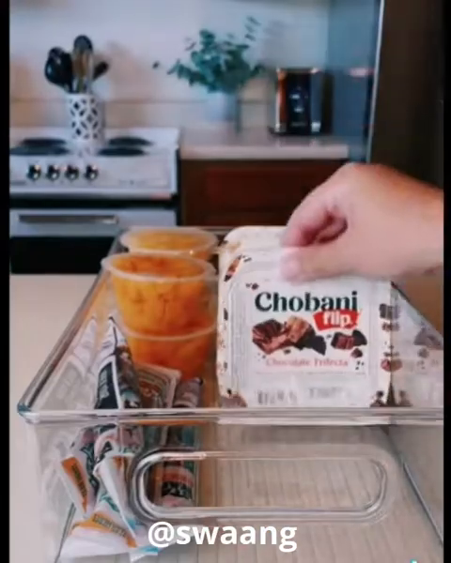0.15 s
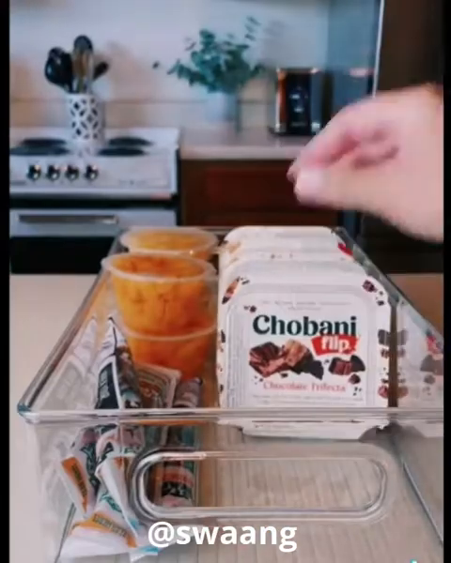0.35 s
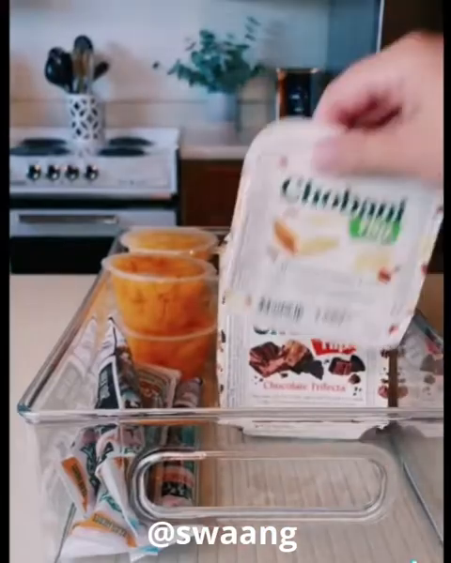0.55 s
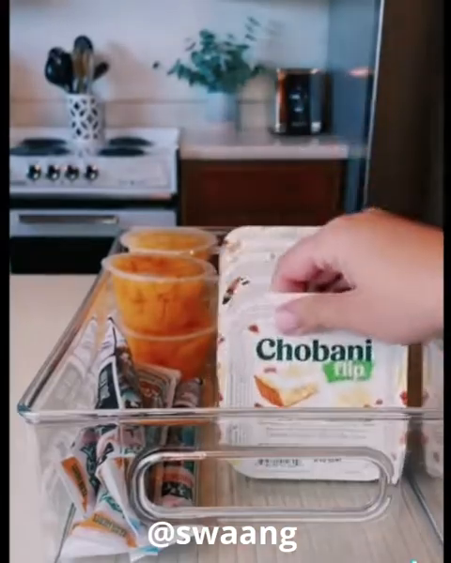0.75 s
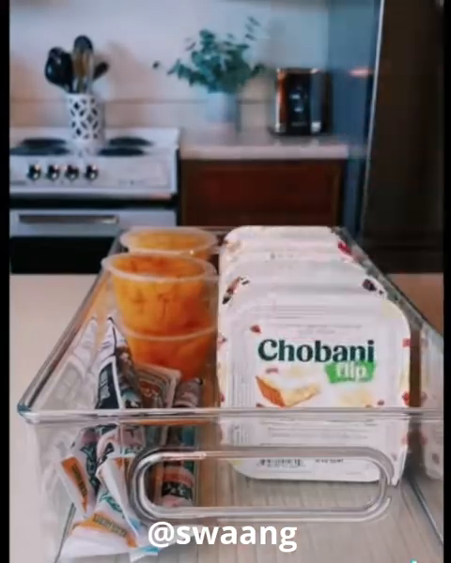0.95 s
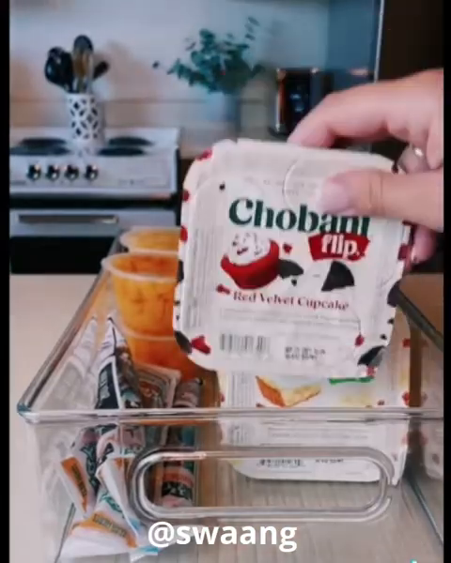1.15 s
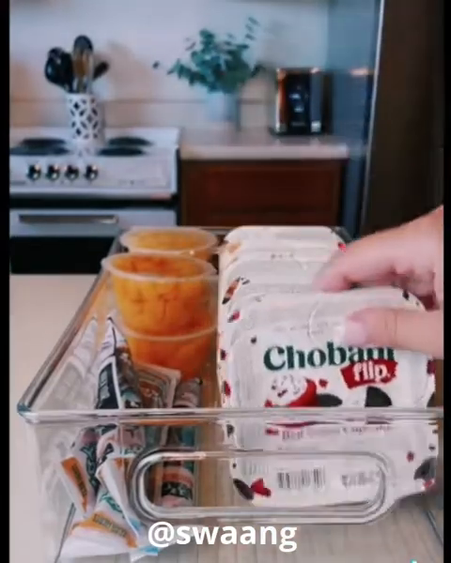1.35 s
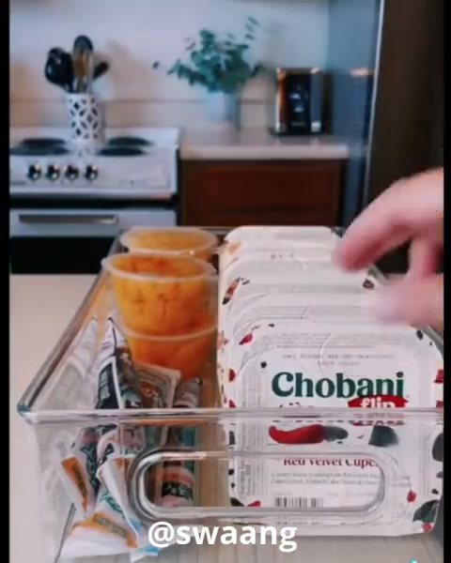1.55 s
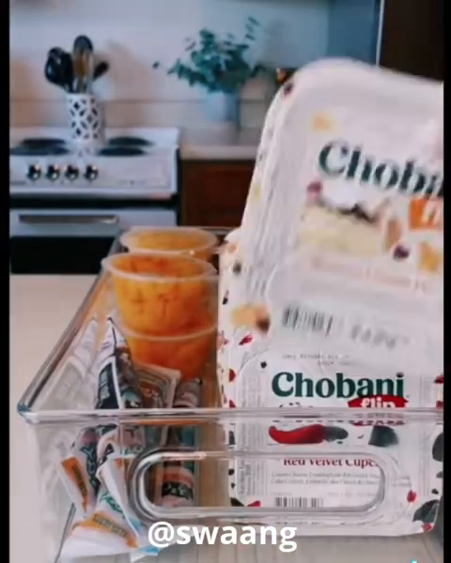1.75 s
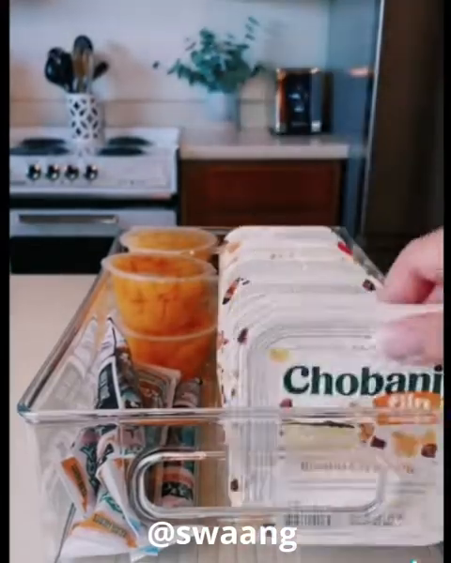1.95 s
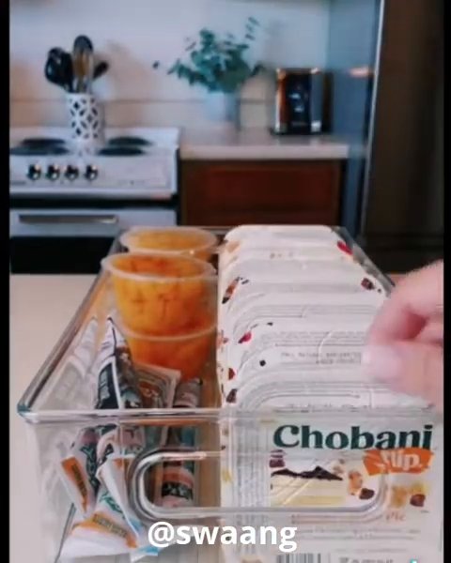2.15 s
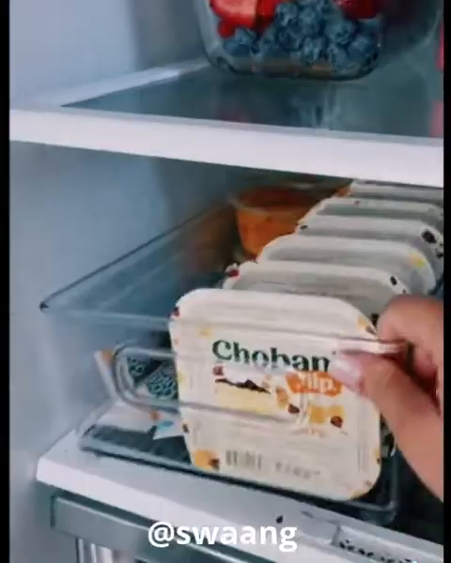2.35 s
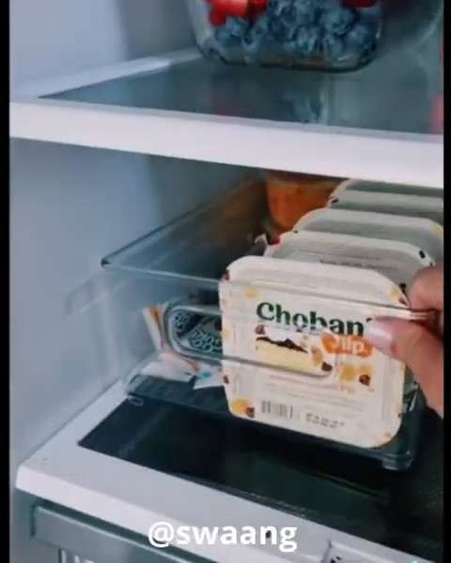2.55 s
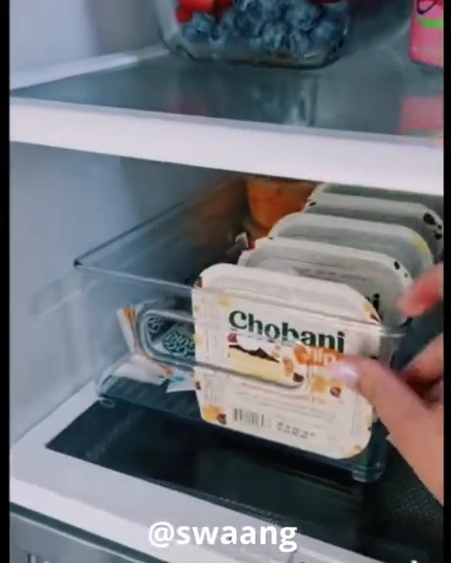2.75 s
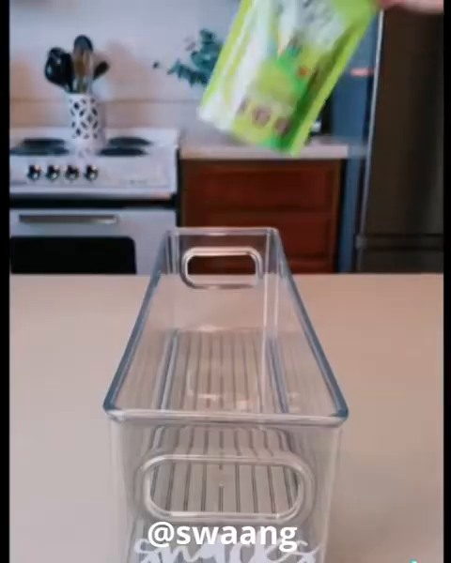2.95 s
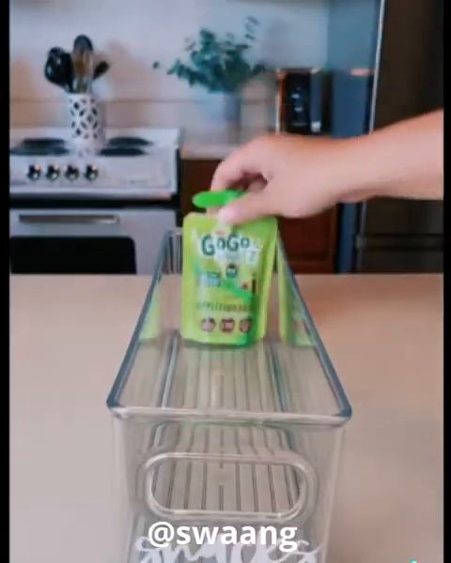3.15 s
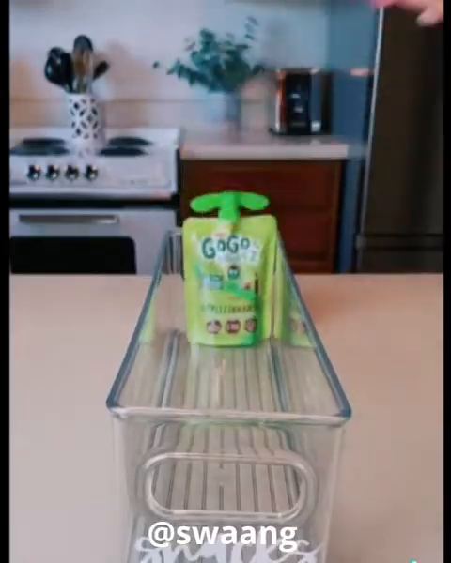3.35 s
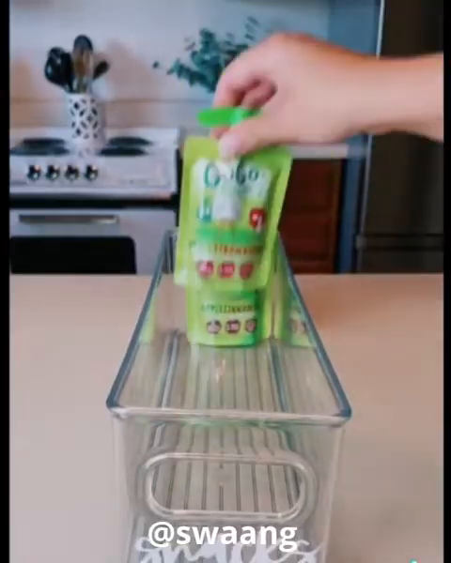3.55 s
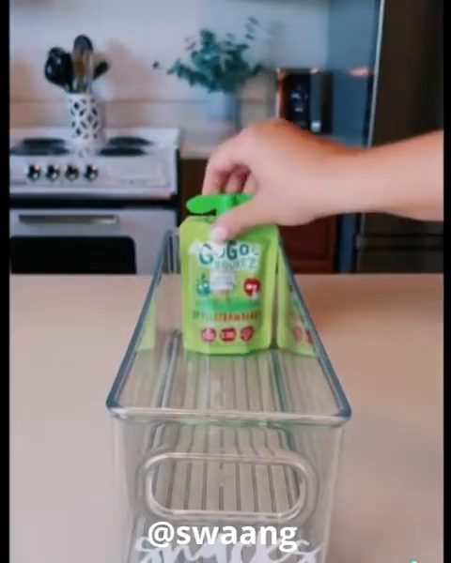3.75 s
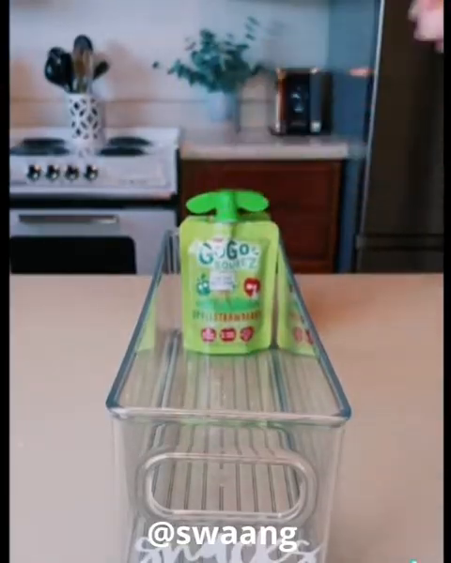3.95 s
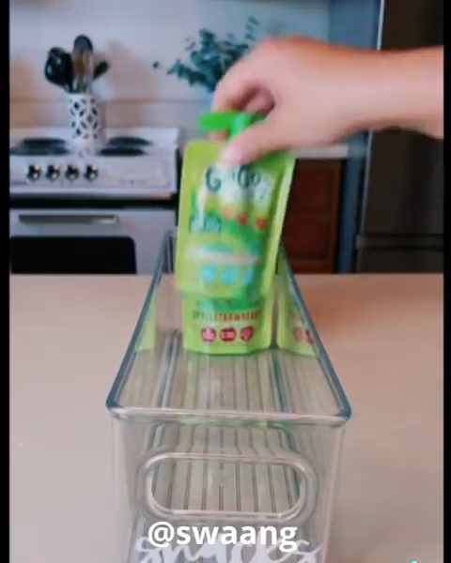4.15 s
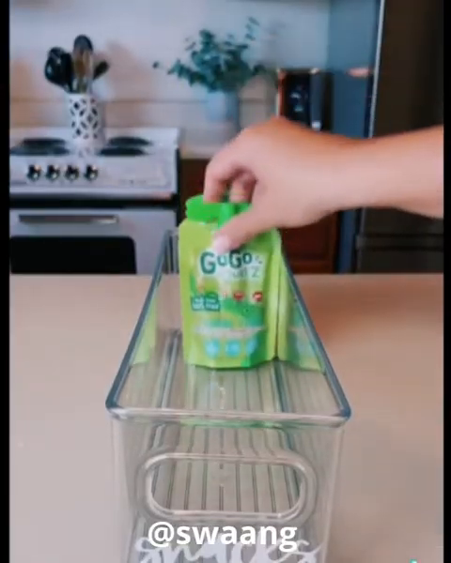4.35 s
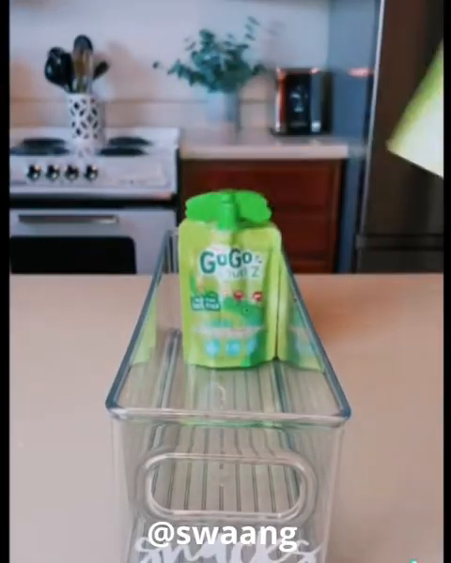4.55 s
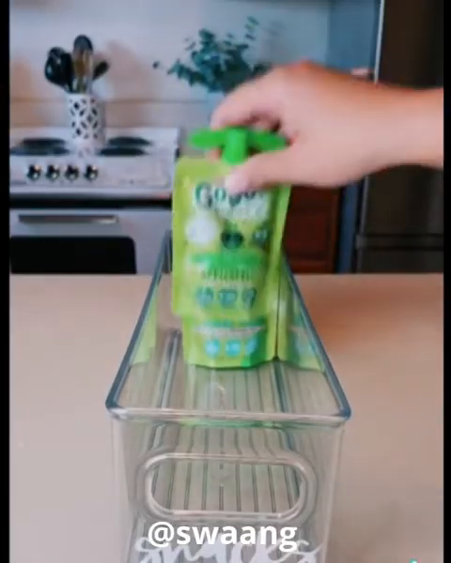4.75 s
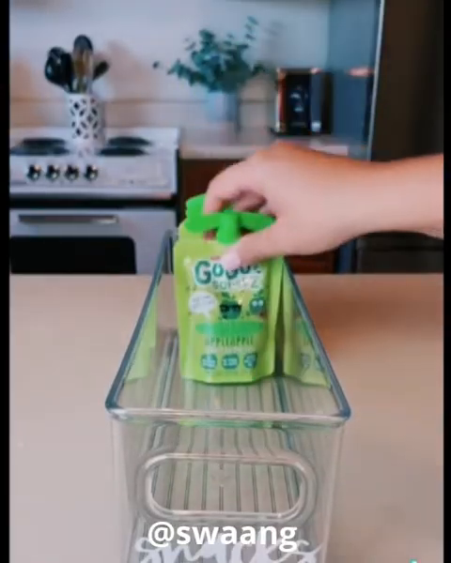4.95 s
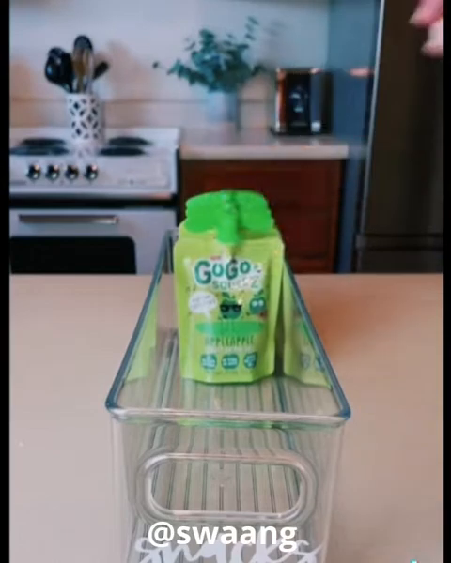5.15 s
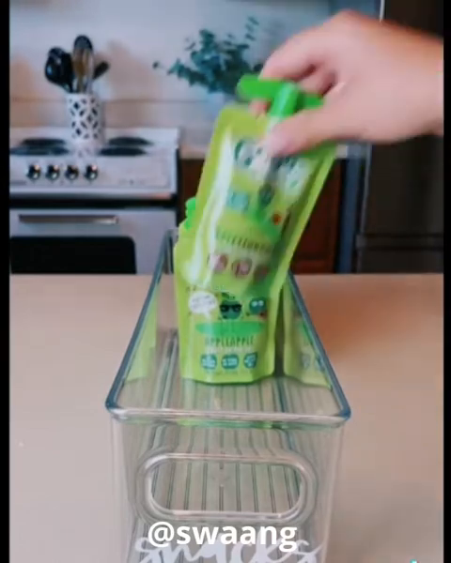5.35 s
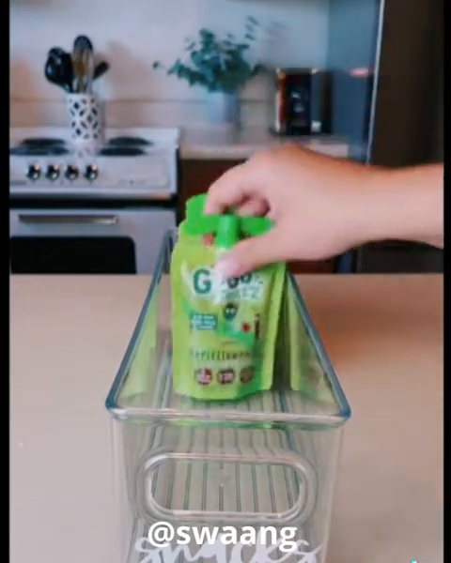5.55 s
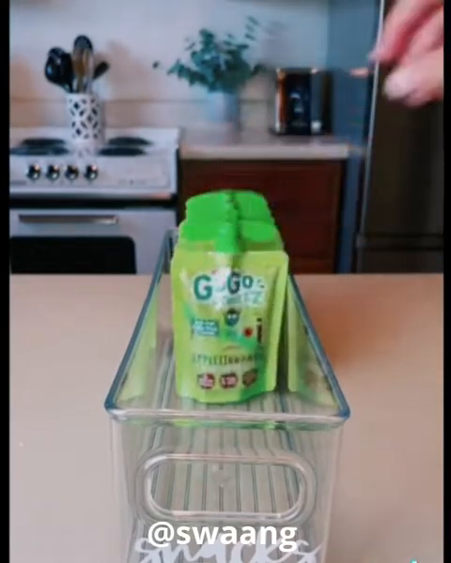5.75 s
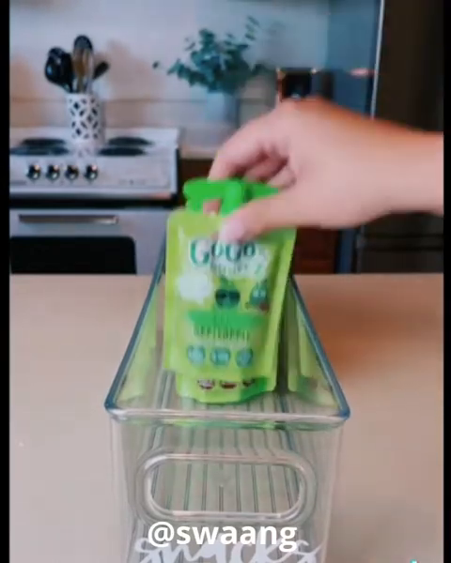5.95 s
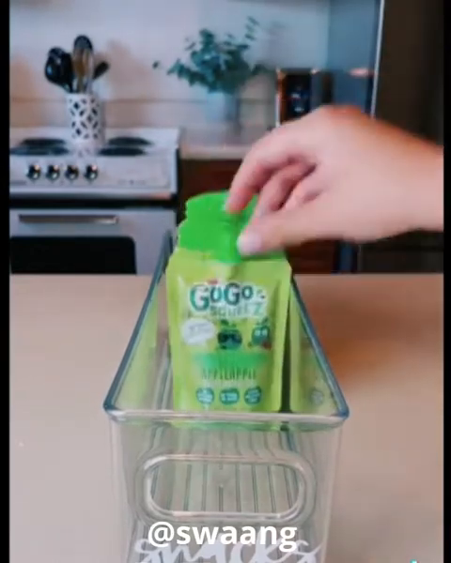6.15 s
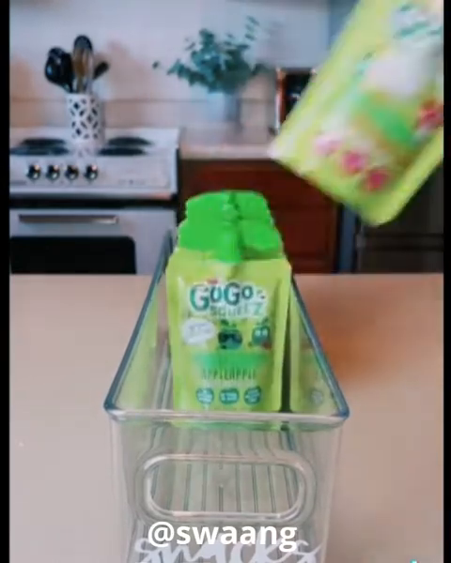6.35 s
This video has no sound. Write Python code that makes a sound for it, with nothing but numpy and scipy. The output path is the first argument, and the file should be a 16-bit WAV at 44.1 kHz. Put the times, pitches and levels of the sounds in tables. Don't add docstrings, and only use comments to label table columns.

```python
import sys
import numpy as np
from scipy import signal
from scipy.fft import rfft, irfft, next_fast_len
from scipy.io import wavfile
from scipy.ndimage import uniform_filter1d

SR = 44100
rng = np.random.default_rng(int(sys.argv[2]) if len(sys.argv) > 2 else 0)


def master_out(mix):
    frames = np.transpose(np.atleast_2d(mix))
    ceiling = np.clip(frames, -1, 1)
    pcm = np.round(ceiling * 32767).astype(np.int16)
    wavfile.write(sys.argv[1], SR, pcm)


def voltage_ratio(decibels):
    exponent = np.asarray(decibels, float) / 20
    return 10 ** exponent


N = 281787

# start_s, end_s
STRETCHES = [
    (0, 2.352),
    (2.352, 2.96),
    (2.97, 3.468),
    (3.466, 6.39),
]
# freq_hz, density_db
TONE_CUPS = [(15, -93), (25, -56), (64, -15.5), (134, -17.5), (175, -6), (236, 3), (309, -9), (363, -6.5),
             (575, -10.5), (1130, -27.5), (1700, -38), (2480, -38), (2760, -41.5), (8140, -52),
             (16000, -52.5)]
TONE_FRIDGE = [(15, -99), (25, -69), (206, 3), (293, -13.5), (531, -17), (1370, -35.5), (2050, -42.5),
               (3430, -49), (16000, -77.5)]
TONE_FAST = [(15, -100), (25, -48), (175, -19.5), (277, -4), (363, -25.5), (394, -5), (476, -19.5),
             (624, -19), (2000, -46), (2760, -49.5), (16000, -66)]
TONE_SLOW = [(15, -78), (25, -18), (87, -22.5), (153, -4), (200, -14), (242, -13), (317, -13), (416, -17),
             (476, -19), (575, -29.5), (714, -31), (988, -43), (1700, -45), (1940, -50.5), (16000, -69.5)]
TONE_DB = (-54.5, -49, -52.5, -53)
TONE_EXTRA_SIDE_DB = (0.053, 10, .1, 0.25)
# freq_hz, side_minus_mid_db
TONE_WIDTH = [(60, -56), (110, -53), (200, -33), (380, -20), (700, -11.5), (1290, 0), (2380, 3), (4400, -5),
              (8120, -2), (15000, 0)]
# start_s, end_s, pitch_hz, width_hz, level_db
HUMS = [
    (0, 3.1, 362, 6.7, -62.5),
    (0, 2.6, 575, 15, -67.5),
    (0, 2.351, 2480, 110, -87),
    (2.8, 2.954, 3350, 25, -85),
    (2.353, 2.954, 208.5, 6, -56.5),
]
# start_s, end_s, lower_hz, lower_db, upper_db
MOTOR = [
    (2.976, 3.468, 397.5, -56, -59),
    (3.468, 3.84, 285.5, -58, -57),
    (3.5, 4.067, 188, -58, -70),
    (4.2, 4.626, 238, -61, -66),
    (4.626, 5.15, 237, -66, -68),
    (5.2, 5.883, 236, -58, -60),
    (5.883, 6.33, 242, -53, -63),
]

# start_s, peak_db, low_hz, high_hz, t60_s
THUDS = [(1.457, -36.5, 229, 325, 0.085), (2.117, -47, 233, 337, 0.096), (2.407, -30, 230, 325, 0.06),
         (2.503, -42, 222, 330, 0.06), (2.567, -31.5, 326, 550, 0.029), (2.6, -18.5, 248, 348, 0.058),
         (2.624, -36, 270, 325, .05), (2.668, -15, 225, 322, 0.043), (2.696, -38, 215, 310, .06),
         (3.747, -42.5, 294, 542, .085), (4.344, -37, 436, 674, 0.037), (4.969, -42, 386, 680, 0.013),
         (6.09, -40.5, 366, 655, 0.087)]
# multiple, level_db
SQUEAK_PARTIALS = [(2, -51), (3, -65), (4, -71), (5, -68)]

# freq_hz, density_db
RUB_COLOUR = [(410, -26.5), (700, -3.5), (1460, -7.5), (1620, -10), (2240, -5), (4050, -10.5), (4730, -8.5),
              (7690, -10.5), (8990, -15.5), (13000, -18.5), (16000, -18.5)]
# freq_hz, gain_db
GLASS_RUB = [(900, -.1), (1800, -3), (2700, 2.1), (4000, .1), (6000, -3), (14000, -.1)]
FOIL_RUB = [(900, -2.1), (1500, 1.1), (2300, 1.6), (3500, -3.5), (5500, 1.1), (8000, -1.1), (14000, -.1)]
# start_s, length_s, level_db, treble_above_body_db
SLIDES = [(0.678, 0.12, -72, 2.5), (1.269, 0.12, -69.5, -2.5), (2.091, 0.063, -64, 3),
          (2.412, 0.045, -58, -13.5), (2.48, 0.28, -69, -7.5), (3.0, 0.046, -75.5, -1.5),
          (3.697, 0.067, -60, -10), (4.264, 0.073, -67, -5), (5.499, 0.13, -58.5, -8.5),
          (1.058, 0.058, -60.5, 7.5), (1.726, 0.054, -64, 11), (5.79, .05, -82, -4),
          (6.262, .105, -78, -20)]
# start_s, length_s, first_level_db, treble_above_body_db
SETTLES = [(0.116, 0.18, -55.5, -11), (0.24, 0.15, -64, -13.5), (0.359, 0.07, -54, -6),
           (0.533, 0.055, -79, -1.5), (0.803, 0.086, -54.5, -6.5), (1.401, 0.096, -58, -7),
           (1.443, 0.1, -48, -10), (1.558, 0.02, -56.5, 0.5), (1.922, 0.045, -62, -11),
           (1.968, .04, -66, -2), (2.028, .04, -72, 4), (2.352, 0.056, -71.5, -2), (2.6, .03, -34, -20),
           (2.777, 0.04, -57, -11), (3.201, 0.12, -44.5, -20.5), (3.757, 0.09, -60.5, -16),
           (4.349, .11, -60, -13), (4.911, 0.035, -62, 5.5), (4.977, .11, -55.5, -16),
           (5.625, 0.085, -57, -13), (5.728, 0.025, -65, -8.5), (6.032, 0.021, -64, 1),
           (6.087, 0.092, -54, -13.5), (6.181, 0.052, -69, -12.5)]

# start_s, peak_db, pitch_hz
CUP_FLECKS = [(.1315, -52, 3300), (.141, -57, 5500), (.144, -56, 3620), (.172, -60, 3620),
              (.1911, -52, 6400), (.2216, -58, 3300), (.227, -60, 6450), (.244, -58, 4500),
              (.2834, -50, 5000), (.309, -62, 7200), (.325, -58, 3600), (.357, -58, 3700),
              (.3665, -40, 3410), (.5398, -56, 6800), (.5703, -63, 7300), (.589, -65, 6800),
              (.6097, -64, 5400), (.6476, -62, 5500), (.692, -58, 7200), (.724, -61, 6000),
              (.7723, -58, 5600), (.7723, -60, 3960), (.8085, -50, 6200), (.8247, -52, 5800),
              (.856, -59, 5900), (.889, -61, 7800), (2.1177, -48, 7400), (1.07, -50, 4700),
              (1.12, -57, 4200), (1.14, -64, 6000), (1.333, -62, 6800), (1.345, -58, 9500),
              (1.414, -54, 10200), (1.562, -58, 6300), (1.73, -54, 5000), (1.741, -56, 2600),
              (1.752, -50, 4700), (1.755, -56, 7900), (1.768, -54, 2800), (1.997, -57, 9500),
              (2.033, -60, 7500), (2.101, -58, 9600)]
# start_s, peak_db, pitch_hz, t60_s
SHELF_RINGS = [(2.4037, -31, 3830, .025), (2.4037, -37, 2680, .036), (2.407, -38, 560, .08),
               (2.4917, -34, 3050, .02), (2.4917, -36, 1380, .04), (2.493, -38, 810, .06),
               (2.493, -43, 630, .06), (2.6035, -33, 2930, .03), (2.601, -36, 1050, .05),
               (2.601, -38, 4330, .015), (2.603, -32, 560, .07), (2.603, -36, 790, .06),
               (2.6029, -25, 350, .055), (2.617, -39, 2130, .025), (2.617, -37, 2630, .025),
               (2.6701, -15, 4480, .011), (2.6701, -15, 1600, .009), (2.6701, -21, 3500, .015),
               (2.6701, -20, 3050, .018), (2.6712, -17, 2630, .022), (2.4925, -29, 2660, .03),
               (2.405, -34, 3400, .015), (2.418, -43, 2600, .03), (2.6701, -26, 5700, .012),
               (2.671, -32, 565, .08)]
# start_s, peak_db, pitch_hz, t60_s
POUCH_RINGS = [(3.171, -56, 7900, .012), (3.1775, -46, 7900, .01), (3.1851, -33, 3470, .025),
               (3.1851, -42, 7300, .015), (3.204, -46, 3560, .02), (3.204, -50, 7900, .015),
               (3.209, -48, 7750, .02), (3.218, -37, 1022, .03), (3.218, -42, 4370, .015),
               (3.2506, -40, 4430, .02), (3.2506, -40, 9800, .01), (3.7511, -34, 5800, .014),
               (3.7511, -36, 2600, .02), (4.345, -42, 4180, .015), (4.345, -36, 656, .04),
               (4.969, -41, 1464, .03), (4.969, -33, 6100, .009), (4.969, -32, 2250, .02),
               (5.518, -54, 5900, .015), (5.524, -52, 2500, .03), (5.536, -52, 2200, .03),
               (4.921, -54, 6650, .04), (4.93, -56, 6650, .03), (4.449, -62, 3800, .01),
               (4.551, -64, 4500, .012), (4.345, -42, 5800, .012), (4.345, -33, 2150, .03),
               (5.608, -42, 4600, .012), (5.617, -52, 5500, .01), (5.6556, -40, 4530, .012),
               (5.6556, -39, 1400, .03), (5.6565, -37, 2340, .022), (5.609, -36, 2450, .02),
               (6.044, -56, 4500, .015), (6.076, -44, 2790, .025), (6.128, -52, 4500, .012),
               (6.199, -54, 4800, .01)]

# freq_hz, density_db
CUP_COLOUR = [(290, -11), (500, -17), (621, -7.5), (784, -11.5), (1160, 0), (1870, 3), (3440, 0.5),
              (8210, -21), (10800, -22.5), (15300, -49), (16000, -33)]
SHELF_COLOUR = [(290, -32), (500, 4.5), (933, -11.5), (2650, -23), (5880, -24.5), (14700, -43),
                (16000, -44.5)]
POUCH_COLOUR = [(290, -28.5), (500, 7), (698, 12), (1050, 2), (1900, 0.5), (3340, -7), (5020, -18.5),
                (6060, -21), (9770, -37), (14700, -36), (16000, -63)]
# start_s, peak_db, mode_hz, treble_above_body_db, t60_s
CUP_KNOCKS = [(.12, -43.5, 2300, -8, 0.011), (.1314, -46.5, 1120, -15, 0.12),
              (.268, -30.5, 1640, -8.5, 0.033), (.2834, -38.5, 2430, -10, 0.037),
              (.3665, -31, 1776, 0.5, 0.029), (.3804, -45, 1240, 0, 0.04), (.6804, -46.5, 2100, 4.5, 0.065),
              (.7416, -54.5, 1420, -12, 0.058), (.8091, -44, 2460, -7, 0.083),
              (.8247, -40.5, 2490, -10, .059), (1.4553, -27, 1144, -3, 0.026),
              (1.4674, -31, 1660, -9, 0.035), (1.928, -38, 3000, -11, 0.006),
              (2.1177, -43.5, 3100, 13, 0.033), (2.2184, -52, 1540, -4.5, 0.055)]
# start_s, peak_db, mode_hz, treble_above_body_db
RIM_CLICKS = [(.8564, -48, 2980, -13), (.902, -56, 3550, 3.5), (1.106, -57, 3570, 14),
              (1.275, -34, 2940, -7.5), (1.3466, -60, 3080, 8), (1.4044, -25.5, 3300, -13),
              (1.4474, -38, 3500, -18), (1.5107, -47.5, 3070, -5), (1.5706, -48.5, 1550, -20),
              (1.9814, -38, 3070, -5), (2.1448, -46.5, 2850, 3.5)]
# start_s, peak_db
LID_CRACKLES = [(.0164, -74), (.191, -66), (.5404, -83), (.6474, -79), (.8884, -80), (1.067, -54),
                (1.0744, -50), (1.5624, -79), (1.7298, -61), (1.7517, -58), (2.0302, -76), (2.099, -87)]
# start_s, peak_db, mode_hz, treble_above_body_db, t60_s
SHELF_TAPS = [
    (2.4038, -26, 3400, -13.5, 0.032),
    (2.4919, -26, 2660, -17, 0.038),
    (2.5648, -46.5, 3140, -2.7, 0.033),
    (2.6015, -31, 2930, -3, 0.03),
    (2.6172, -35.5, 2547, -12.5, 0.035),
    (2.6701, -10.5, 2630, -9, 0.019),
    (2.7802, -61, 1250, -21, 0.034),
    (2.7941, -47, 2830, -6.5, 0.025),
]
# start_s, peak_db, mode_hz, treble_above_body_db, t60_s
POUCH_KNOCKS = [(3.1715, -49, 2970, -10, 0.019), (3.1851, -28, 1310, -4, 0.076),
                (3.218, -33.5, 2440, -0.5, 0.039), (3.2506, -34, 2117, 5.5, 0.046),
                (3.6842, -44, 3600, 9, .02), (3.7125, -50.5, 1760, 1, .071), (3.7511, -27, 1920, 0, 0.036),
                (3.7888, -48.5, 1940, 2, .03), (4.2768, -54.5, 4750, 3, .024),
                (4.345, -29.5, 1912, -6.5, 0.079), (4.9197, -53.5, 6650, -8.5, 0.04),
                (4.969, -25, 1950, -6, 0.055), (5.5124, -54, 2220, 11, .028), (5.5221, -43, 2220, -8, 0.14),
                (5.6081, -29.5, 1950, -9.5, 0.041), (5.6556, -29, 2370, -6, 0.027),
                (6.0375, -63, 1543, -1, .032), (6.0764, -38.5, 1490, -19, 0.088),
                (6.0916, -24, 1950, -12, 0.03), (6.1061, -32, 2250, -10, 0.074),
                (6.1867, -56, 1540, 3.5, 0.021)]
# start_s, peak_db, mode_hz
POUCH_TICKS = [(3.8397, -54.5, 2920), (3.9265, -51.5, 2940), (3.9514, -61.5, 1690), (4.0053, -60, 2930),
               (4.3155, -50.5, 2160), (4.4192, -44.5, 2070), (4.5256, -62.5, 1950), (4.572, -55.5, 2180),
               (4.609, -63, 1277), (5.0326, -49.5, 2060), (5.0599, -51, 2175), (5.098, -56, 2280),
               (5.7314, -47, 2590), (5.8104, -60, 1780), (6.2048, -49, 2640), (6.2706, -62.5, 2500),
               (6.3294, -65, 2520)]
# start_s, peak_db
BUMPS = [
    (3.493, -73.5),
    (4.0871, -74),
    (5.8944, -75),
]
# [mode_hz, [treble_above_body_db,]] t60_s
CLICK = (0.023,)
CRACKLE = (5850, 16.5, 0.037)
TICK = (-11.5, 0.048)
BUMP = (1640, -25.5, 0.028)

CUTS = [.528, 1.057, 1.722, 2.351, 4.067, 4.626, 5.264, 5.883, 6.373]
# start_s, gap_s
LONG_CUT = (2.954, .022)
# start_s, peak_db
SPLICE_TICKS = [
    (2.952, -54),
    (4.626, -60),
    (4.63, -62),
    (5.264, -58),
    (5.883, -58),
]
CUT_S = 0.0015


def along(table, hz):
    table_hz, values = np.transpose(table)
    return np.interp(np.log(np.maximum(hz, 1)), np.log(table_hz), values)


def unit(x):
    return x / np.sqrt(np.mean(x ** 2) + 1e-18)


def walk(size, rate_hz):
    hold = int(SR / rate_hz)
    steps = np.repeat(rng.standard_normal(size // hold + 1), hold)
    return 1.6 * uniform_filter1d(uniform_filter1d(steps, hold), hold)[:size]


def taper(n, ramp_s):
    k = np.arange(n)
    return np.minimum(np.minimum(k, n - k) / (ramp_s * SR), 1)


def stereo(mid, side):
    return np.array([mid + side, mid - side])


def balance(left_db):
    return voltage_ratio([[left_db / 2], [-left_db / 2]])


def add(out, start_s, x):
    i = int(round(start_s * SR))
    n = min(x.shape[1], N - i)
    out[:, i:i + n] += x[:, :n]


def causal(gain):
    cepstrum = irfft(np.log(gain + 1e-9))
    half = cepstrum.shape[-1] // 2
    cepstrum[..., 1:half] *= 2
    cepstrum[..., half + 1:] = 0
    return np.exp(rfft(cepstrum))


def room_tone():
    out = np.zeros((2, N))
    colours = (TONE_CUPS, TONE_FRIDGE, TONE_FAST, TONE_SLOW)
    for (start_s, end_s), db, side_db, colour in zip(STRETCHES, TONE_DB, TONE_EXTRA_SIDE_DB, colours):
        n = int((end_s - start_s) * SR) + 1
        size = next_fast_len(n)
        hz = np.fft.rfftfreq(size, 1 / SR)
        noise = rfft(rng.standard_normal((2, size))) * voltage_ratio(along(colour, hz))
        noise /= 1 + (hz / 14300) ** 40
        noise[1] *= voltage_ratio(np.minimum(along(TONE_WIDTH, hz) + side_db, 0))
        octave = np.log2(np.clip(hz, 40, 10240) / 40)
        flickering = np.zeros((2, n))
        for k in range(9):
            band = irfft(noise * np.maximum(1 - abs(octave - k), 0), size)[:, :n]
            flickering += band * voltage_ratio(2.4 * 0.8 ** k * walk(n, 6))
        mid, side = flickering / irfft(noise[0], size).std()
        add(out, start_s, voltage_ratio(db) * taper(n, 0.00024) * stereo(mid, side))
    return out


def line(start_s, end_s, hz, width_hz):
    n = int((end_s - start_s) * SR)
    waver = 1 + 0.34 * (walk(n, width_hz) + 1j * walk(n, width_hz))
    carrier = np.exp(2j * np.pi * (hz * np.arange(n) / SR + rng.random()))
    return unit(np.real(waver * carrier)) * taper(n, 0.0068) * np.ones((2, 1))


def hums():
    out = np.zeros((2, N))
    for start_s, end_s, hz, width_hz, db in HUMS:
        add(out, start_s, voltage_ratio(db) * line(start_s, end_s, hz, width_hz))
    ratio, width_hz = 1.107, 4.0
    for start_s, end_s, hz, low_db, high_db in MOTOR:
        add(out, start_s, voltage_ratio(low_db) * line(start_s, end_s, hz, width_hz))
        add(out, start_s, voltage_ratio(high_db) * line(start_s, end_s, ratio * hz, width_hz))
    return out


def kitchen(x):
    level_db, t60_s, treble_t60_s, top_hz = -18.5, 0.12, 0.14, 6120
    t = np.arange(int(0.4 * SR)) / SR
    common, left, right = rng.standard_normal((3, len(t)))
    tail = common + 1.1 * np.array([left, right])
    tail *= voltage_ratio(-60 * t / t60_s) * (1 - np.exp(-t / 0.0053))
    dull = signal.lfilter(*signal.butter(1, top_hz, fs=SR), tail)
    tail = dull + (tail - dull) * voltage_ratio(-60 * t / treble_t60_s)
    tail /= np.sqrt((tail ** 2).sum(1, keepdims=True))
    tail = signal.lfilter(*signal.butter(2, 450, "high", fs=SR), tail)
    return voltage_ratio(level_db) * signal.fftconvolve(x, tail, axes=1)[:, :N]


def thuds():
    rise_cycles = 2.6
    counter_hz, counter_db, counter_t60_s = 103, -50.5, 0.09
    out, t = np.zeros((2, N)), np.arange(int(0.25 * SR)) / SR
    counter = np.sin(2 * np.pi * counter_hz * t) * voltage_ratio(counter_db - 60 * t / counter_t60_s)
    for start_s, db, low_hz, high_hz, t60_s in THUDS:
        rise_s = rise_cycles / low_hz
        ring = np.sin(2 * np.pi * low_hz * t)
        ring += 1.3 * np.sin(2 * np.pi * high_hz * t) * voltage_ratio(-25 * t / t60_s)
        swell = 1 - np.exp(-(t / rise_s) ** 2)
        ring *= voltage_ratio(db - 60 * t / t60_s) * swell * voltage_ratio(60 * rise_s / t60_s)
        ring += counter
        add(out, start_s, stereo(ring, 0.1 * ring))
    return out


def squeak():
    start_s, end_s, pitch_hz = 2.432, 2.474, 1340
    out = np.zeros((2, N))
    for multiple, db in SQUEAK_PARTIALS:
        tone = line(start_s, end_s, multiple * pitch_hz, 66)
        rise = np.linspace(0, 1, tone.shape[1])
        add(out, start_s, voltage_ratio(db) * tone * rise * np.minimum(8 * (1 - rise), 1))
    return out


def strokes():
    rubs = [(s, s + length_s, db, db - 2, treble_db) for s, length_s, db, treble_db in SLIDES]
    for s, length_s, db, treble_db in SETTLES:
        fall_db = 11.5 + 1.08 * (db + 60)
        rubs.append((s, s + length_s, db, db - fall_db, treble_db))
    return rubs


def rubbing(grain_db, hiss, patchy_db):
    t, size = np.arange(N) / SR, next_fast_len(N)
    slips_per_s, attack_s, release_s = 1600, 0.0066, 0.04
    slips = rng.random(N) < slips_per_s / SR
    slips = slips * voltage_ratio(grain_db * np.minimum(rng.exponential(size=N), 3))
    slips = uniform_filter1d(slips, 24)

    gains = np.zeros((2, N))
    for start_s, end_s, start_db, end_db, treble_db in strokes():
        span = slice(int(start_s * SR), int((end_s + release_s) * SR))
        db = np.interp(t[span], [start_s, end_s, end_s + release_s], [start_db, end_db, end_db - 25])
        grip = np.minimum((t[span] - start_s + 1 / SR) / attack_s, 1)
        bright_db = db + treble_db + 0.95 * (db - (start_db + end_db) / 2)
        gains[:, span] += grip * voltage_ratio([db, bright_db])
    body = gains[0]
    bright = (gains[1] + 1e-9) / (body + 1e-9)

    hz = np.fft.rfftfreq(size, 1 / SR)
    shake = rng.standard_normal((2, N)) * (hiss + unit(slips)) * voltage_ratio(1.2 * walk(N, 60))
    colour = rfft(shake, size) * voltage_ratio(along(RUB_COLOUR, hz)) * hz ** 2 / (hz ** 2 + 900 ** 2)
    third = 3 * np.log2(np.clip(hz, 900, 14400) / 900)
    scale = irfft(colour[0] * (third < 7), size).std()
    material = np.searchsorted([STRETCHES[1][0], STRETCHES[2][0]], t)
    out = np.zeros((2, N))
    for k in range(13):
        band = irfft(colour * np.maximum(1 - abs(third - k), 0), size)[:, :N]
        centre_hz = 900 * 2 ** (k / 3)
        material_db = np.array([0, along(GLASS_RUB, centre_hz), along(FOIL_RUB, centre_hz)])
        tilt = bright ** np.clip((k - 3.5) / 5.5, -0.8, 0.7)
        out += band * voltage_ratio(material_db)[material] * tilt * voltage_ratio(patchy_db * walk(N, 22))
    return body / scale * stereo(out[0], 0.39 * out[1])


def rings(table, side, left_db):
    rise_cycles = 1.3
    out, t = np.zeros((2, N)), np.arange(int(0.1 * SR)) / SR
    for (start_s, db, hz, t60_s), (split, turn) in zip(table, rng.random((len(table), 2))):
        fade = voltage_ratio(db - 60 * t / t60_s) * (1 - np.exp(-(t * hz / rise_cycles) ** 2))
        port_phase = side * (turn - 0.5) * min(hz / 2000, 1) * np.array([[1], [-1]])
        phase = 2 * np.pi * hz * t + port_phase
        pair = np.sin(phase) + 0.4 * np.sin(phase * (1.02 + 0.03 * split))
        add(out, start_s, fade * pair)
    return out * balance(left_db)


def contacts(table, low_db, follow=0.89, kind=()):
    rows = []
    for row in table:
        start_s, db, hz, treble_db, t60_s = tuple(row) + tuple(kind[len(row) - 5:])
        bass_db = low_db - 40 + follow * (db + 40)
        rows.append((start_s, db, hz, bass_db, db + treble_db, t60_s))
    return rows


def taps(table, colour, side_db, left_db, chatter_s):
    out, n = np.zeros((2, N)), 4096
    t, hz = np.arange(n) / SR, np.fft.rfftfreq(n, 1 / SR)
    low = 1 / (1 + (hz / 1200) ** 6)
    high = 1 / (1 + (5000 / np.maximum(hz, 1)) ** 6)
    patch_axis = np.log2(np.maximum(hz, 500) / 500)
    for start_s, body_db, peak_hz, low_db, high_db, t60_s in table:
        shake = rng.standard_normal((2, n))
        patches = rng.standard_normal((2, 24))
        bounce_size, bounce_delay = rng.random(2)
        life_s = np.clip(t60_s, 0.004, 0.08)
        patchy = np.array([voltage_ratio(2.5 * np.interp(patch_axis, np.arange(24) / 4.6, p)) for p in patches])
        peak = 1 + 2.6 / (1 + ((hz - peak_hz) / (0.047 * peak_hz)) ** 2)
        shape = voltage_ratio(along(colour, hz)) * patchy * peak
        sound = np.zeros((2, n))
        bands = ((low, low_db, 1.5), (1 - low - high, body_db, 1.01), (high, high_db, 0.7))
        for share, db, stretch in bands:
            fade = voltage_ratio(-60 * t / (life_s * stretch)) + 1.6 * np.exp(-t / 0.00047)
            fade *= 1 - np.exp(-t / 0.000083)
            delay = int(chatter_s * SR * (0.17 + bounce_delay))
            fade += 0.5 * bounce_size * np.roll(fade, delay)
            part = irfft(rfft(shake * fade) * causal(shape * share), n)
            if share is low:
                part[1] *= 0.4
            sound += part * voltage_ratio(db) / abs(part[0]).max()
        add(out, start_s - 0.0004, stereo(sound[0], voltage_ratio(side_db) * sound[1]))
    return out * balance(left_db)


def scene():
    cups = contacts(CUP_KNOCKS, low_db=-0.5)
    cups += contacts(RIM_CLICKS, low_db=-10.5, kind=CLICK)
    cups += contacts(LID_CRACKLES, low_db=-5, kind=CRACKLE)
    shelf = contacts(SHELF_TAPS, low_db=2.0, follow=0.3)
    pouches = contacts(POUCH_KNOCKS, low_db=-7.5)
    pouches += contacts(POUCH_TICKS, low_db=-27, kind=TICK)
    pouches += contacts(BUMPS, low_db=20, kind=BUMP)
    fleck_t60_s = 0.016
    flecks = [tuple(row) + (fleck_t60_s,) for row in CUP_FLECKS]

    handled = thuds() + squeak() + rubbing(grain_db=4.0, hiss=0.75, patchy_db=2.6)
    handled += rings(flecks, side=1.1, left_db=0.1)
    handled += rings(SHELF_RINGS, side=2.8, left_db=3.1)
    handled += rings(POUCH_RINGS, side=1.1, left_db=-0.3)
    handled += taps(cups, CUP_COLOUR, side_db=-11.5, left_db=-0.1, chatter_s=0.00081)
    handled += taps(shelf, SHELF_COLOUR, side_db=-3, left_db=2.1, chatter_s=0.0011)
    handled += taps(pouches, POUCH_COLOUR, side_db=-10.5, left_db=0.0, chatter_s=0.00072)
    return room_tone() + hums() + kitchen(handled) + handled


def roll_off(x):
    return signal.sosfilt(signal.butter(12, 16490, fs=SR, output="sos"), x)


def record(dry):
    port_hz, top_hz = 91, 15700
    heard = signal.sosfilt(signal.butter(2, port_hz, "high", fs=SR, output="sos"), dry)
    for start_s, db in SPLICE_TICKS:
        heard[:, int((start_s + CUT_S) * SR) + 3] += voltage_ratio(db)
    keep = np.ones(N)
    for start_s, gap_s in [(s, CUT_S) for s in CUTS] + [LONG_CUT]:
        keep[int(start_s * SR):int((start_s + gap_s) * SR)] = 0
    heard = heard * uniform_filter1d(keep, size=4)
    heard = signal.sosfilt(signal.ellip(6, 0.3, 40, top_hz, fs=SR, output="sos"), heard)
    return roll_off(heard)


dry = scene()
out = record(dry)
master_out(out)
```